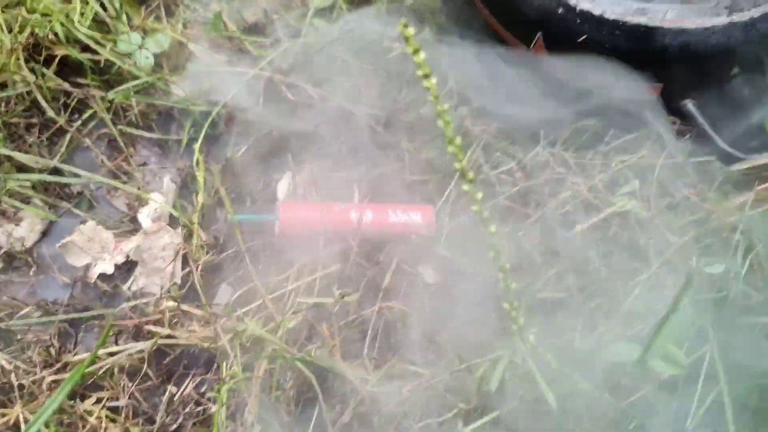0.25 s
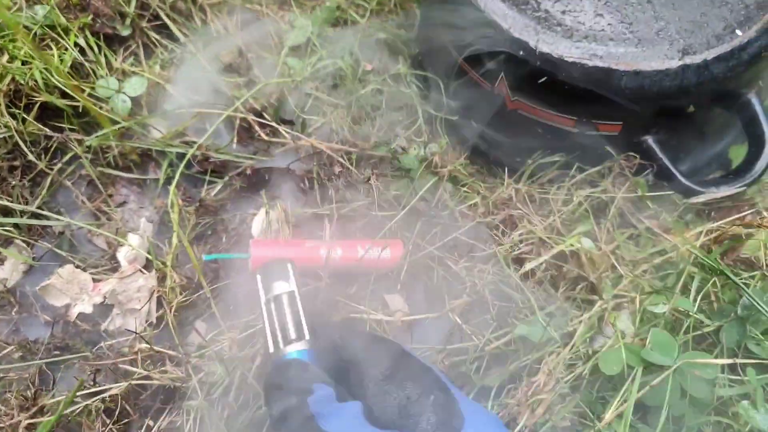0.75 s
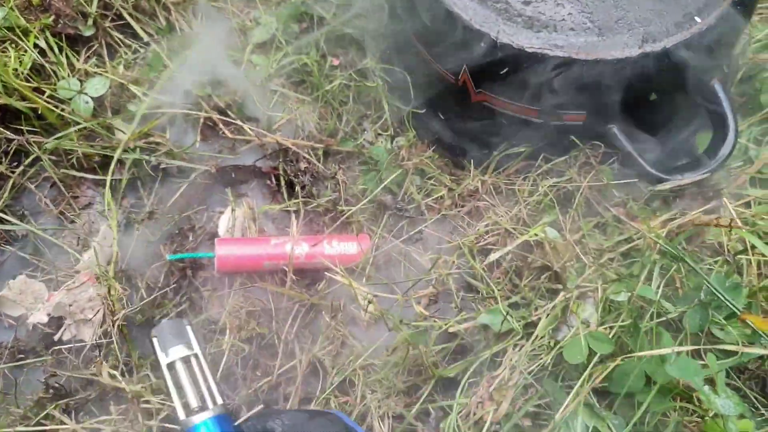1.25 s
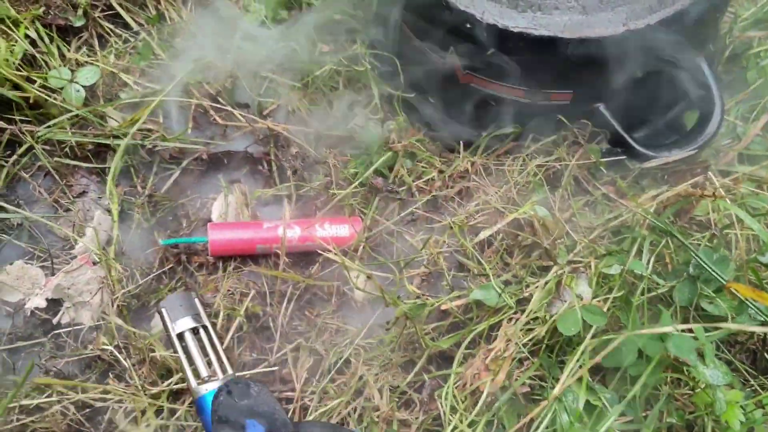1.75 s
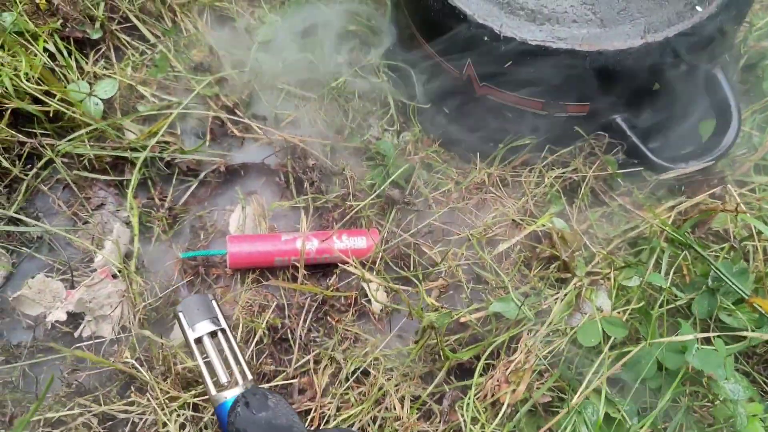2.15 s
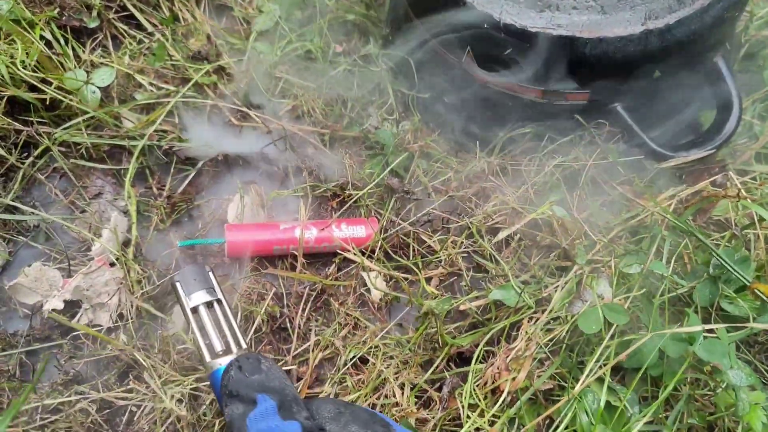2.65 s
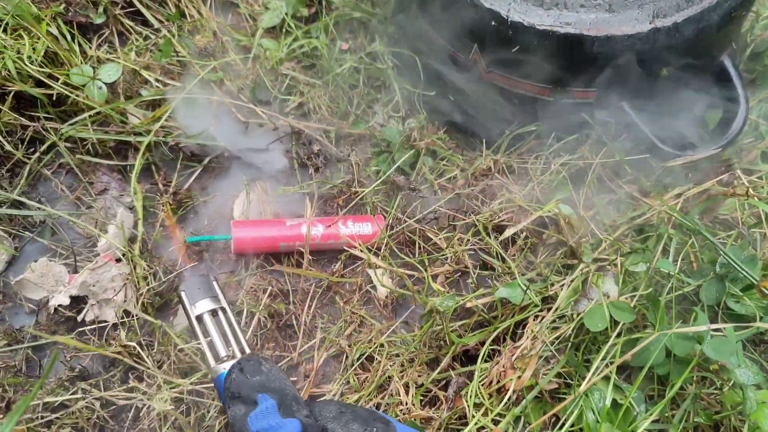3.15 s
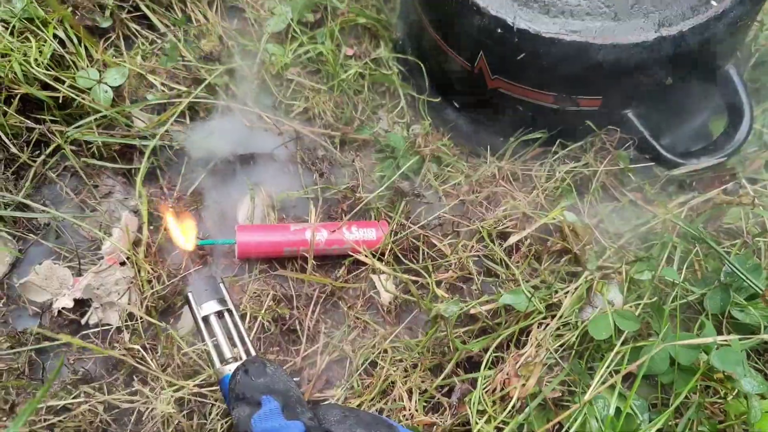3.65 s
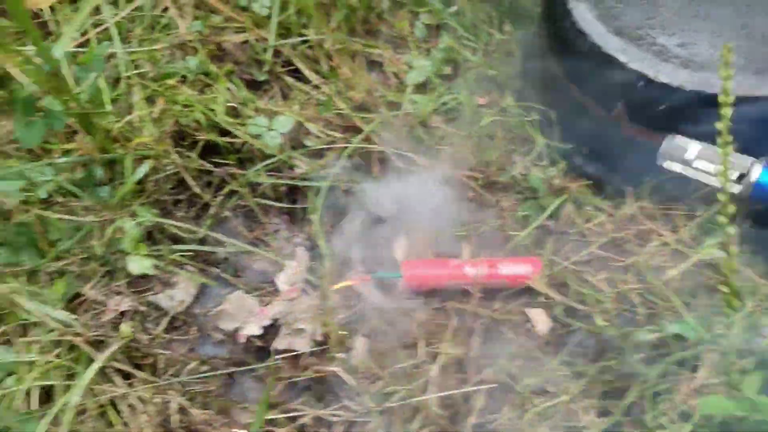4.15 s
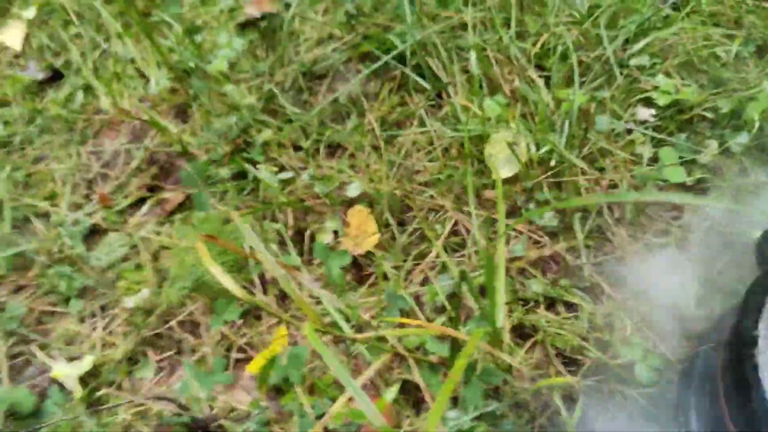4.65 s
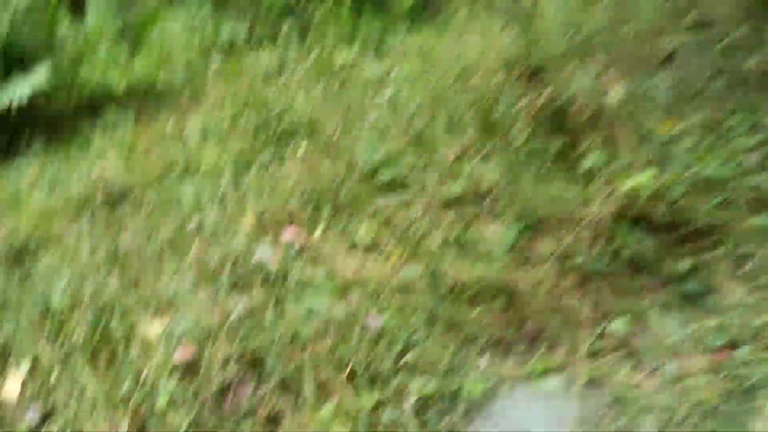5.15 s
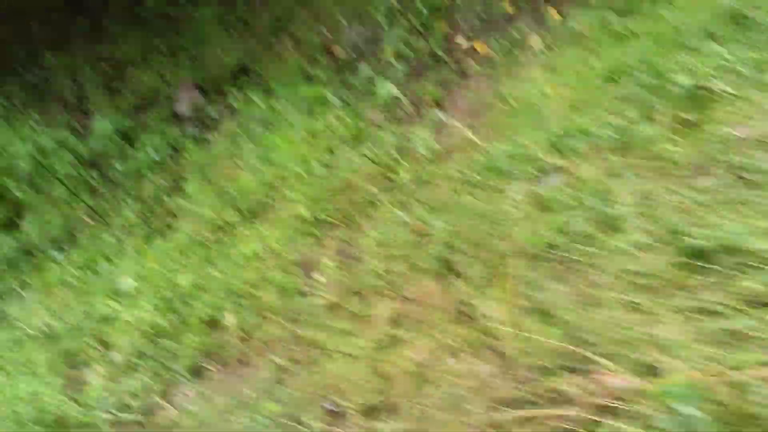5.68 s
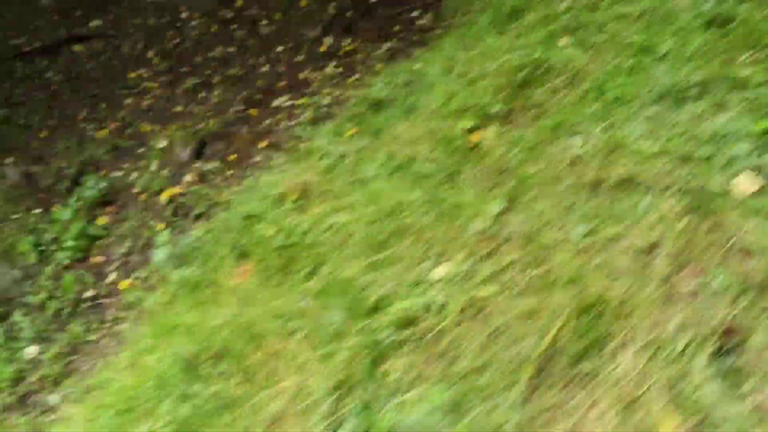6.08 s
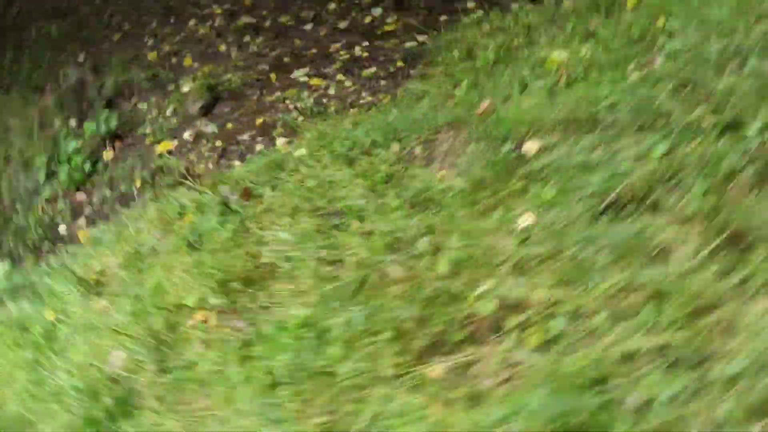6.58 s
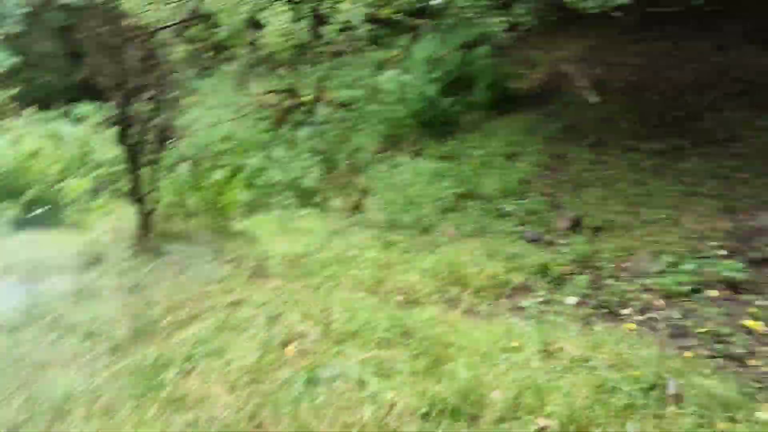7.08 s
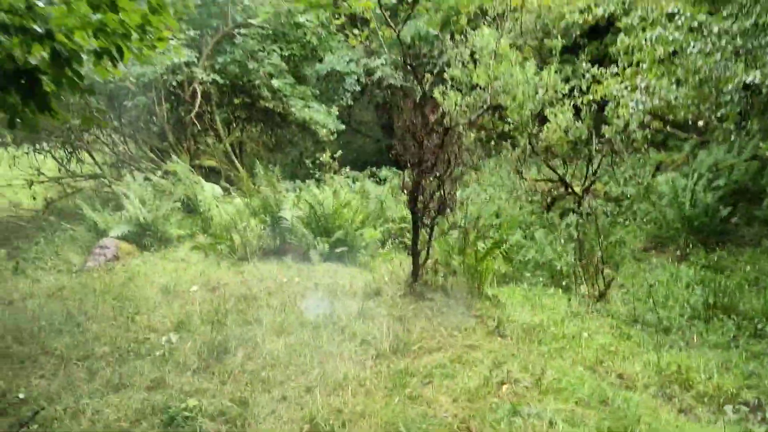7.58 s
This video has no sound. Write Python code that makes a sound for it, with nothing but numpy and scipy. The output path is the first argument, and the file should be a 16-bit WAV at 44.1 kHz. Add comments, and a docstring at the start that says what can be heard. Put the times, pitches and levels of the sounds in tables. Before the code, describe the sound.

Lighter clicks and gas torch hisses and roars over quiet outdoor air, then a metal pot clanks, scrapes and thuds down before hurried grassy running.

```python
"""Orchard grass: someone crouching lights a firecracker fuse with a gas torch, then covers it with a steel pot and runs.
Igniter: noise bursts. Torch: resonant gas hiss, a tube hum and a banded roar. Pot: decaying modes, cracks, rough scrape.
Gas catching fire and the pot landing push the air in damped swings; footfalls and hand jolts thump the phone.
Jacket and grass rustle in grainy noise, small ticks snap, wind buffets the ports over still air."""
import sys
import numpy as np
from scipy import signal
from scipy.fft import rfft, irfft, next_fast_len
from scipy.io import wavfile
from scipy.ndimage import uniform_filter1d

SR = 44100
rng = np.random.default_rng(int(sys.argv[2]) if len(sys.argv) > 2 else 0)


def store_wav(level_fs):
    """Save 16-bit WAV to argv[1]."""
    pcm = np.round(np.clip(np.atleast_2d(level_fs), -1, 1) * 32767)
    wavfile.write(sys.argv[1], SR, pcm.T.astype(np.int16))


N = 344862
SIDES = np.array([[1], [-1]])   # left, right


def from_db(db):
    """Gain of a level in dB."""
    return 10 ** (np.asarray(db) / 20)


def rms_one(x):
    """Scaled to rms 1."""
    return x / np.sqrt(np.mean(x ** 2) + 1e-20)


def in_time(tables, outside_db=None):
    """Columns of one or more curve tables, interpolated sample by sample."""
    rows = np.vstack(tables)
    s, *columns = rows[np.argsort(rows[:, 0], kind="stable")].T
    t = np.arange(N) / SR
    return [np.interp(t, s, column, outside_db, outside_db) for column in columns]


def at_hz(points, hz):
    """A spectrum table read at one frequency, on a log axis."""
    table_hz, values = np.array(points).T
    return np.interp(np.log(hz), np.log(table_hz), values)


def drift(rate_hz):
    """Slow random curve of rms 1: noise through a double pole, computed every 40 samples."""
    r = np.exp(-80 * np.pi * rate_hz / SR)
    noise = rng.standard_normal(N // 40 + 2002)
    slow = signal.lfilter([1], [1, -2 * r, r * r], noise)[2000:]
    return np.interp(np.arange(N) / 40, np.arange(len(slow)), rms_one(slow))


def band(x, low_hz, high_hz):
    """Butterworth band-pass."""
    edges_hz = [low_hz, min(high_hz, .45 * SR)]
    return signal.sosfilt(signal.butter(2, edges_hz, "band", fs=SR, output="sos"), x)


def resonance(x, hz, width_hz):
    """Two-pole resonance, gain about 1 on top."""
    r = np.exp(-np.pi * width_hz / SR)
    poles = [1, -2 * r * np.cos(2 * np.pi * hz / SR), r * r]
    return signal.lfilter([(1 - r * r) / 2, 0, (r * r - 1) / 2], poles, x)


def placed(x, pan_db, lead_s):
    """Left-right level difference and left lead above the bass, which a phone's two ports hear alike."""
    low = signal.lfilter(*signal.butter(1, 700, fs=SR), x)
    size = next_fast_len(len(x) + 2 ** 8)
    hz = np.arange(size // 2 + 1) * SR / size
    turn = np.exp(1j * np.pi * lead_s * SIDES * hz)
    high = irfft(rfft(x - low, size) * turn, size)[:, :len(x)]
    return low + high * from_db(pan_db / 2 * SIDES)


def add(out, s, piece):
    """Mixes a short piece in at a time."""
    i = int(s * SR)
    out[..., i:i + piece.shape[-1]] += piece[..., :N - i]


def banded_noise(spectrum, patchiness, grain_db=0., treble_db=0.):
    """Third-octave stereo noise, each band with its own level, flicker and likeness; rms 1 before treble lift."""
    # hz, left_right_correlation
    likeness = [(60, 1.0), (150, 0.99), (380, 1), (950, 0.18), (2380, 0.054), (5980, 0.083), (15000, 0.62)]
    out, power, together = 0, 0, drift(34)
    edges_hz = 2 ** np.arange(np.log2(spectrum[0][0]), np.log2(spectrum[-1][0]) + .1, 1 / 3)
    grains = from_db(grain_db * np.minimum(rng.exponential(1, N), 4))
    white = rng.standard_normal((2, 2, N)) * grains
    for k, (low_hz, high_hz) in enumerate(zip(edges_hz, edges_hz[1:])):
        mid, side = band(white[k % 2], low_hz, high_hz)
        hz = np.sqrt(low_hz * high_hz)
        alike = np.clip(at_hz(likeness, hz), -1, 1)
        stereo = np.sqrt(1 + alike) * mid + np.sqrt(1 - alike) * side * SIDES
        flicker_db = patchiness * (0.57 * together + 1.14 * drift(19.8))
        layer = from_db(at_hz(spectrum, hz) + flicker_db) * stereo
        power += np.mean(layer ** 2)
        # lift grows from 5.5 kHz, full 0.73 octave up
        out = out + layer * from_db(treble_db * np.clip(np.log2(hz / 5500) / 0.73, 0, 1))
    return out / np.sqrt(power)


def burst(rise_ms, fall_ms):
    """Exponential rise and fall; the top lies 8 ms in."""
    t_ms = np.arange(int(.06 * SR)) / SR * 1000 - 8
    return np.exp(np.where(t_ms < 0, t_ms / max(rise_ms, .05), -t_ms / max(fall_ms, .05)))


def igniter():
    """The spring-loaded striker rattles in plastic body and metal tip: four noise bands share a short burst."""
    # start_s, level_db, rise_and_fall_ms; relative to level: body_db, striker_db, treble_db, knock_db
    clicks = [(1.7543, -2.5, 0.69, -15, -12, -7.5, -57), (2.002, -13, 1.37, -6.5, -34, -2, -15.5),
              (2.1807, -6, 1.15, -9.5, -10.5, -8.5, -40), (3.9652, -16, 0.73, -2, -10, -17, -25),
              (3.9721, -2.5, 1.24, -10.5, -15.5, -3.5, -22)]
    # left-right pan_db of body, striker, treble, knock
    part_pans_db = [3, 9, 1, 0]
    edges_hz = [(2000, 5800), (6600, 8600), (13000, 19000), (900, 1250)]
    out = np.zeros((2, N))
    for s, db, length_ms, *part_levels_db in clicks:
        tail = from_db(-23.0) * burst(length_ms, fall_ms=13.7)
        shape = burst(length_ms, length_ms) + tail
        noise = rng.standard_normal((4, len(shape))) * shape
        for n, part_db, pan_db, (low_hz, high_hz) in zip(noise, part_levels_db, part_pans_db, edges_hz):
            density_gain = np.sqrt(SR / 2 / (high_hz - low_hz))   # evens out band widths
            part = band(band(n, low_hz, high_hz), 920, 14000) * density_gain
            add(out, s - .007, placed(from_db(db + part_db) * part, pan_db, lead_s=.00011))
    return out


def torch():
    """Gas whistles and sprays while the valve is open; once lit, the flame roars and the warming tube hums louder."""
    # valve opens_s, closes_s; at opening: whistle_db, spray_db
    valve = [(1.765, 2.023, -59, -61.5), (2.21, 3.955, -57, -63)]
    # jet whistle: hz, width_hz, level_db
    jet_modes = [(5170, 330, 0), (9950, 800, -1.5), (13150, 500, -14)]
    # flame spectrum: hz, relative level_db_per_hz
    roar_spectrum = [(35, -39), (60, -12), (113, -15.5), (264, -3), (359, -10), (435, -2), (777, -16.5),
                     (861, -10.5), (1300, -31), (1690, -45), (2860, -120)]
    jet_rise_db_per_s, spray_fall_db_per_s = 0.5, 0.5
    lit_s, roar_db = 2.21, -57.5
    tube_hz, tube_width_hz = 1660, 450   # width of each of two passes
    tube_cold_db, tube_hot_db, tube_warms_s = -93, -61, 1

    t, gas = np.arange(N) / SR, rng.standard_normal(N)
    jet = 0
    for k, (hz, width_hz, db) in enumerate(jet_modes):
        jet = jet + from_db(db) * resonance(gas, hz, width_hz) * (-1) ** k
    jet = rms_one(jet)
    tube = rms_one(resonance(resonance(gas, tube_hz, tube_width_hz), tube_hz, tube_width_hz))
    spray = rms_one(band(gas, 4300, 13300))
    hiss = 0
    for opens_s, closes_s, jet_db, spray_db in valve:
        age_s = t - opens_s
        whistle = from_db(jet_db + jet_rise_db_per_s * age_s) * jet
        broad = from_db(spray_db - spray_fall_db_per_s * age_s) * spray
        hiss = hiss + (age_s > 0) * (t < closes_s) * (whistle + broad)
    lit = (t > lit_s) * (t < valve[-1][1])
    tube_db = np.interp(t, [lit_s, lit_s + tube_warms_s], [tube_cold_db, tube_hot_db])
    hum = lit * from_db(tube_db) * tube
    roar = lit * from_db(roar_db) * banded_noise(roar_spectrum, patchiness=1.5)
    return placed(hiss + hum, pan_db=4.0, lead_s=.00016) + roar


def pot():
    """Blows ring the steel wall modes and crack; dragging feeds rough grains into rim and wall."""
    # wall: hz, level_db, t60_s before damping
    modes = [(1281, 0, .25), (1696, -9, .36), (1750, -12, .28), (2008, -20, .18), (2708, -21, .19),
             (2896, -11, .22), (2993, -10, .18), (3978, -24, .2), (5243, -8, .16), (6191, -25, .18),
             (7020, -21, .14), (8834, -19, .12), (9975, -22, .18), (10580, -26, .15), (11850, -22, .13),
             (13010, -7, .07), (13580, -10, .07), (13800, -8, .065), (14030, -8, .06), (15015, -8, .055)]
    # start_s, level_db, ring_time_share, dulling_db_per_octave, crack_db, left-right pan_db (held to -5..2)
    blows = [(4.233, -15, 0.96, 0.62, 9, 1.5), (4.2536, -29, 0.79, 0.1, 11.5, 0),
             (4.2714, -41, 0.32, 0.5, 18, 2), (4.8905, -14, 0.2, 4, 8, -5)]
    # drag: start_s, rim_hiss_db, wall_ring_db
    scrape = [(4.36, -50, -53), (4.414, -37.5, -55), (4.57, -50.5, -57), (4.702, -45, -49.5),
              (4.8, -100, -66)]
    # rim: hz, width_hz (before widening), level_db
    rim_modes = [(4040, 140, 2), (4600, 45, -2), (4980, 18, 1), (6270, 20, -5), (6360, 53, -8),
                 (6540, 42, -11), (6860, 46, 5), (7400, 40, 3), (9250, 38, 4.5)]
    out = np.zeros((2, N))
    t = np.arange(int(.6 * SR)) / SR
    for s, db, damping, dull_db, crack_db, pan_db in blows:
        ring = 0
        for (hz, level_db, t60_s), lean in zip(modes, rng.uniform(-1, 1, len(modes))):
            phase = 2 * np.pi * hz * t + .7 * lean * SIDES   # each mode radiates its own way
            mode_db = level_db - dull_db * np.log2(hz / 1000) - 60 * t / (t60_s * damping)
            ring = ring + from_db(mode_db) * np.sin(phase)
        noise = rng.standard_normal(len(t))
        low = band(noise, 320, 1090) * from_db(0.83 * dull_db) + band(noise, 710, 3560)
        high = from_db(-4.5 * dull_db) * band(noise, 2000, 12400)
        decay = from_db(crack_db - 60 * t / 0.034) + from_db(crack_db - 16.5 - 60 * t / 0.22)
        crack = placed((0.72 * low + high) * decay, np.clip(pan_db, -5, 2), lead_s=-0.000217)
        rise = np.minimum(t / (.0001 + .001 * dull_db), 1)   # a dull blow builds slowly
        add(out, s, from_db(db) * rise * (ring * from_db(-.7 * SIDES) + crack))

    rim_db, wall_db = in_time([scrape], outside_db=-150)
    grit = rng.standard_normal(N) * from_db(1.8 * np.minimum(rng.exponential(1, N), 4))
    rim = .22 * band(grit, 3500, 10000)
    for hz, width_hz, db in rim_modes:
        rim = rim + from_db(db + 4 * drift(14)) * resonance(grit, hz, width_hz * 1.8)
    wall = rms_one(resonance(grit, modes[0][0], width_hz=77))
    drag = from_db(rim_db) * rms_one(rim) + from_db(wall_db) * wall
    return out + placed(drag, pan_db=-2.5, lead_s=-0.00018)


def air_pushes():
    """Gas catching fire and the pot landing push the air: heavily damped swings of steady or falling pitch."""
    # start_s, level_db, signed_gain, start_pitch_hz, swell_ms, slowing_per_s
    pushes = [(2.184, -13, -0.78, 154, 2.4, 31), (4.8918, -10, -1, 318, 3.2, 0),
              (4.8925, -22.5, 0.65, 625, 3.5, 5), (4.9057, -10, 1, 179, 2.8, 4.5)]
    out, t = np.zeros(N), np.arange(int(.12 * SR)) / SR
    for s, db, signed_gain, hz, swell_ms, slowing_per_s in pushes:
        age = t * 1000 / swell_ms
        swing = np.sin(2 * np.pi * hz * t / (1 + slowing_per_s * t))
        add(out, s, signed_gain * from_db(db) * swing * age ** 2 * np.exp(2 - 2 * age))
    return out * from_db(-.15 * SIDES)


def jolts():
    """Jolts of the hand and footfalls: short damped swings over a dull noise knock of the case."""
    # start_s, level_db, pitch_hz
    hits = [(5.639, -39, 538), (5.803, -26, 70.4), (5.891, -31, 102), (5.905, -16.5, 105),
            (6.027, -28, 471), (6.101, -23.5, 630), (6.194, -25.5, 233), (6.309, -26, 475),
            (6.419, -24.5, 514), (6.441, -19.5, 580), (6.473, -18, 517), (6.495, -18, 149),
            (6.527, -7.5, 645), (6.561, -19, 274), (6.721, -23, 125), (6.889, -31.5, 100),
            (7.021, -31.5, 211), (7.077, -21.5, 580), (7.229, -31, 570), (7.262, -34, 750),
            (7.372, -30, 183), (7.439, -31.5, 100), (7.6, -29.5, 690), (7.693, -31.5, 338)]
    cycles_to_minus_60_db, knock_db = 6.3, -19.5
    out, t = np.zeros(N), np.arange(int(.12 * SR)) / SR
    for s, db, hz in hits:
        decay = from_db(-60 * t * hz / cycles_to_minus_60_db)
        swing = np.sin(2 * np.pi * hz * t) * decay * np.minimum(t * hz * 3.4, 1)
        noise = rms_one(band(rng.standard_normal(len(t)), 360, 1330))
        knock = noise * from_db(knock_db - 60 * t / 0.077) * np.minimum(t / 0.0023, 1)
        add(out, s, -from_db(db) * (swing + knock))
    return out * from_db(-.15 * SIDES)


def rustle():
    """Dense grains of cloth and grass rubbing; each swish rises out of the steady shuffle with quick edges."""
    # steady shuffle: start_s, level_db, treble_lift_db
    shuffle = [(0, -54, -2), (0.58, -57, 6), (0.76, -54.5, 4.5), (1.3, -62, 2), (1.7, -59.5, -7),
               (1.85, -65, -2), (2.14, -57.5, -4), (2.3, -57.5, -10), (3.7, -64, -1), (4.02, -52.5, 12),
               (4.19, -55.5, 11.5), (4.48, -47, 3), (4.68, -54.5, 14), (5.2, -56, -6), (5.5, -48, 7),
               (5.69, -57.5, 1.5), (5.9, -52.5, 14.5), (6.03, -49, -1), (6.49, -51, 8), (6.85, -56, 1.5),
               (6.99, -46.5, 1), (7.17, -58.5, 6), (7.6, -56, 11.5), (7.82, -66, -2)]
    # start_s, left-right pan_db
    side = [(0.0, 0), (0.57, -2), (0.8, 2.1), (4.07, 1.7), (5.01, -3), (5.2, -1), (6.66, -3.5),
            (7.82, -0.2)]
    # sleeve or leg: start_s, length_s, level_db, treble_lift_db
    swishes = [(0.035, 0.034, -39, 3.5), (0.074, 0.02, -33.5, -5), (.125, 0.023, -52.5, 5),
               (0.231, 0.042, -51, 8), (0.311, 0.015, -50.5, -2), (0.343, 0.022, -53, 1.5),
               (0.422, 0.039, -48, 6), (0.499, 0.067, -45.5, 8), (.656, 0.056, -53.5, 5),
               (0.88, 0.037, -56.5, 8.5), (0.973, 0.052, -52, 2), (1.108, 0.032, -55.5, 6),
               (1.419, 0.033, -51, 6), (1.53, 0.021, -53, -5), (1.613, 0.044, -53.5, 4),
               (1.713, .013, -50, -3), (2.122, 0.04, -57, -3), (5.273, 0.045, -34, 9.5),
               (5.322, 0.11, -35.5, 2.5), (5.447, 0.034, -37, 4), (5.55, 0.04, -46, 4.5),
               (5.853, 0.065, -47.5, 8), (6.518, 0.022, -34.5, 3.5), (6.655, 0.053, -52, 9.5),
               (6.711, 0.042, -44.5, 5.5), (6.94, .12, -60, 6), (7.229, .015, -53.5, 8)]
    # hz, relative level_db_per_hz
    cloth = [(410, -12), (580, -14), (730, -14), (920, -11), (1160, -10), (1770, 1), (2700, -1), (3790, -2),
             (4730, -2), (8420, -9.5), (10700, -17.5), (14000, -15), (16000, -20)]
    swish_rise_db, scratch_rms_db = 1.5, 2   # rise over each swish; unevenness
    level_db, treble_db = in_time([shuffle])
    pan_db, = in_time([side])
    power = from_db(2 * level_db)
    scratch_db = scratch_rms_db * drift(73)
    for s, length_s, db, lift_db in swishes:
        i, n = int(s * SR), int(length_s * SR)
        swish_db = db + np.linspace(0, swish_rise_db, n) + scratch_db[i:i + n]
        power[i:i + n] += from_db(2 * swish_db)
        treble_db[i:i + n] = lift_db
    gain = uniform_filter1d(np.sqrt(power), size=260)   # 6 ms edges
    smooth_treble_db = uniform_filter1d(treble_db, size=260)
    grains = banded_noise(cloth, patchiness=1.98, grain_db=3.5, treble_db=smooth_treble_db)
    return grains * gain * from_db(pan_db / 2 * SIDES)


def ticks():
    """Twigs, seams and sparks: each tick is a broad noise snap with a lift at its own pitch."""
    # start_s, level_db, pitch_hz, left-right pan_db (held to -6..6)
    snaps = [(0.0338, -29, 1530, 0), (0.1034, -46, 9970, -9), (0.2488, -32.5, 9600, 6),
             (0.2554, -29, 9400, -9), (0.7114, -42, 13000, 6), (0.73, -39.5, 2420, 0),
             (0.752, -42, 1820, -1), (0.8049, -30, 2930, 6), (1.4287, -39.5, 2340, 3),
             (1.9796, -47, 2650, 13), (2.1272, -46, 1950, 3), (2.145, -42, 7590, 4), (3.572, -40, 11900, 6),
             (3.6016, -42, 9000, 6), (4.117, -37.5, 9100, 6), (5.5694, -30.5, 2300, 6),
             (5.908, -28.5, 1580, 0), (5.9894, -34, 1730, 6), (6.001, -34, 1400, 2),
             (6.0306, -28.5, 2230, 2), (6.101, -36, 1810, 0), (6.342, -35.5, 1980, 0),
             (6.383, -38, 2180, 0), (6.5266, -19, 2170, -11), (7.0816, -36, 1870, -7),
             (7.229, -34, 11100, 6), (7.6962, -37.5, 1590, 0)]
    out = np.zeros((2, N))
    for s, db, hz, pan_db in snaps:
        shape = burst(rise_ms=.4, fall_ms=.9)
        noise = rng.standard_normal(len(shape))
        broad = rms_one(band(noise, 1500, 11000))
        pitched = rms_one(band(noise, hz * 0.62, hz * 1.46))
        snap = band(shape * (0.65 * broad + pitched), 970, 17000)
        add(out, s - .0075, placed(from_db(db) * snap, np.clip(pan_db, -6, 6), lead_s=.00005))
    return out


def wind():
    """Lumpy eddies on the ports once the phone moves, nearly alike in both; the case edge sings in a narrow band."""
    # two runs of: start_s, buffet_db, flutter_db
    gusts = [
        [(3.8, -88, -71), (3.822, -70, -57), (4.454, -57, -49), (4.502, -64, -48.5), (4.836, -59, -58.5),
         (4.86, -65, -49)],
        [(4.98, -65, -56), (5.09, -78, -70.5), (5.41, -54, -44), (5.6, -56, -47.5), (5.67, -53, -64.5),
         (5.79, -42.5, -51.5), (5.87, -40, -48), (5.91, -34, -33), (5.98, -48.5, -54), (6.18, -46, -45),
         (6.36, -41, -52.5), (6.55, -36.5, -36), (6.62, -50, -54), (6.74, -42, -43), (6.82, -52, -54.5),
         (6.88, -42, -54), (7.04, -43, -44.5), (7.19, -58, -62), (7.35, -58, -53.5), (7.46, -41, -43),
         (7.49, -43, -60.5), (7.82, -91, -62.5)],
    ]
    # edge tone held while the run is fastest: start_s, end_s, level_db
    sings = [(5.957, 6.054, -46), (6.06, 6.25, -44.5), (6.254, 6.51, -41)]
    edge_low_hz, edge_high_hz, edge_re_flutter_db = 440, 700, -6
    buffet_db, flutter_db = in_time(gusts, outside_db=-150)
    edge_db = flutter_db + edge_re_flutter_db
    for start_s, end_s, db in sings:
        edge_db[int(start_s * SR):int(end_s * SR)] = db
    edge_db = uniform_filter1d(edge_db, size=900)   # 20 ms
    eddies = rng.standard_normal((3, 2, N))
    buffet = rms_one(band(eddies[0], 30, 80.3) * from_db(2.4 * drift(3)))
    gusty = band(eddies[1], 130, 400) + .33 * band(eddies[1], 650, 1300)
    flutter = rms_one(gusty * from_db(3.5 * drift(22)))
    narrow = band(band(eddies[2], edge_low_hz, edge_high_hz), edge_low_hz, 950)
    edge = rms_one(narrow * from_db(3 * drift(25)))
    out = 0
    # last item: share that differs between the ports
    for (both, apart), db, share in [(buffet, buffet_db, .03), (flutter, flutter_db, .2), (edge, edge_db, .35)]:
        out = out + from_db(db) * (both + share * apart * SIDES)
    return out


def still_air():
    """Steady banded noise of the orchard air."""
    # hz, relative level_db_per_hz
    spectrum = [(15, -36), (25, 3), (78, 6.5), (304, -6), (483, 1.5), (706, -8.5), (1730, 1), (3230, -13),
                (4730, -20.5), (8370, -3.5), (9850, -0.5), (14800, -19), (16500, -24)]
    return from_db(-62) * banded_noise(spectrum, patchiness=2.5)


def scene():
    """All sources over the still air of the orchard."""
    handling = igniter() + torch() + pot() + air_pushes() + jolts()
    return handling + rustle() + ticks() + wind() + still_air()


def record(dry):
    """The ports colour the treble, peaks stop at full scale, the top is cut."""
    # port colour: hz, width_hz, added_share
    ports = [(9930, 350, 0.33), (11500, 1500, -0.33), (13600, 2400, 1.14)]
    cutoff_hz = 16800
    coloured = dry + sum(share * resonance(dry, hz, width_hz) for hz, width_hz, share in ports)
    low_pass = signal.cheby2(24, 85, cutoff_hz, fs=SR, output="sos")
    return signal.sosfilt(low_pass, np.clip(coloured, -1, 1))


dry = scene()
out = record(dry)
store_wav(out)
```